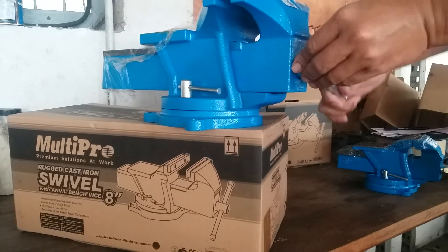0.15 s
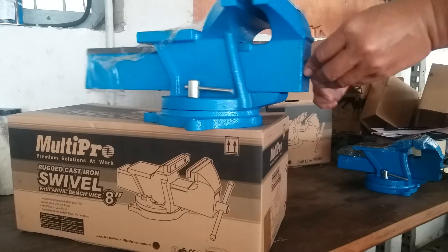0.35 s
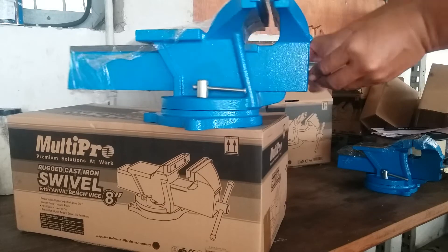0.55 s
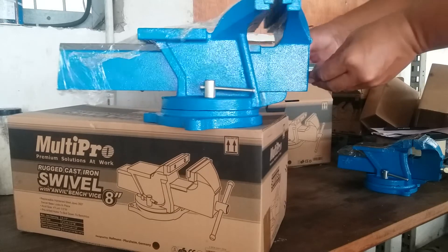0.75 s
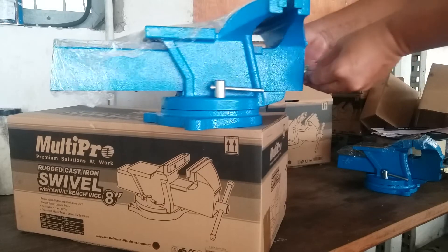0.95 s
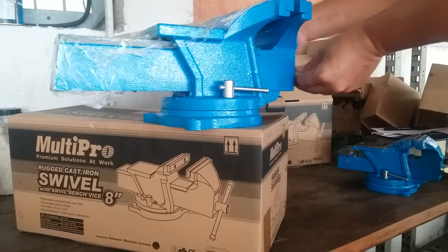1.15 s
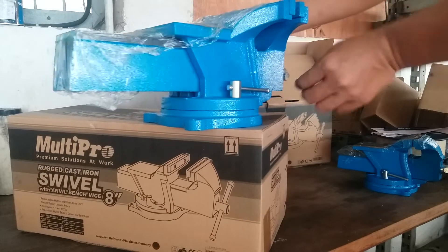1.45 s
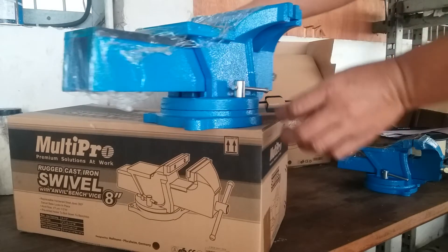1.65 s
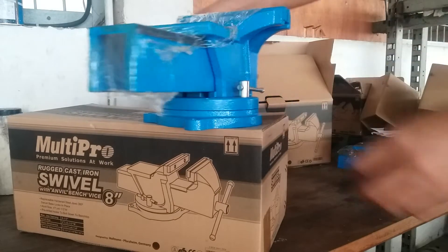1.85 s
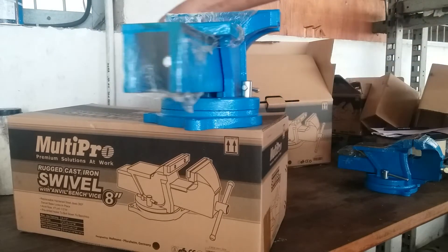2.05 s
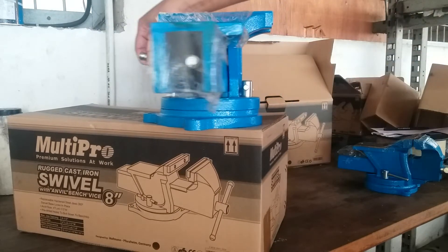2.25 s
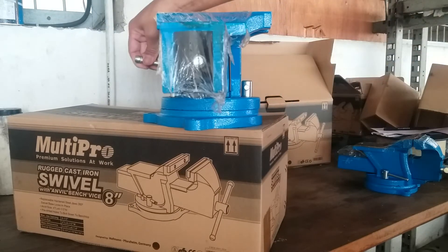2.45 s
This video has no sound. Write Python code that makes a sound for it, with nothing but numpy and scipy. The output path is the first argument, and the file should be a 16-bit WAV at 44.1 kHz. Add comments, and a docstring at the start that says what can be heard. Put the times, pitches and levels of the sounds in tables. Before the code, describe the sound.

Rough iron-on-iron scraping of a turning bench vise, with knocks, hollow box rumble and a final clunk

```python
"""Iron vise turning on a carton

A heavy cast-iron vise, standing on a cardboard carton, is pushed round on its swivel base in a workshop.
Noise grains and sudden catches ring the iron; a wandering low tone and resonant noise boom in the carton.
The loose steel handle ticks in decaying sines, plastic wrap snaps in noise puffs, a clunk ends the turn.
A low hum and hiss of shaped noise and thin gliding sine whistles stay behind."""
import sys
import numpy as np
from scipy import signal
from scipy.fft import rfft, irfft, next_fast_len
from scipy.io import wavfile
from scipy.ndimage import uniform_filter1d, map_coordinates

SR = 44100
rng = np.random.default_rng(int(sys.argv[2]) if len(sys.argv) > 2 else 0)


def master(y):
    """Save y as 16-bit WAV."""
    cut = np.clip(np.atleast_2d(y).T, -1, 1)
    pcm = np.round(cut * 32767)  # scale
    wavfile.write(sys.argv[1], SR, pcm.astype(np.int16))


N = 114660
T = np.arange(N) / SR
SIDES = np.array([[.5], [-.5]])  # shares a left-minus-right difference between the two ears

# Hum and hiss, spectral shape: f/Hz, level/dB
FLOOR_SHAPE = [(18, -28), (30, 4.5), (105, -1.5), (193, -2.5), (257, -17.5), (391, -14.5), (952, -26),
               (1980, -26.5), (2200, -27), (4020, -36), (7950, -48), (12400, -38.5), (15700, -39)]
# Hum and hiss, left-right likeness: f/Hz, correlation (-1 to 1)
FLOOR_LIKENESS = [(60, 1), (240, 0.89), (950, -0.038), (3770, -0.25), (15000, -0.13)]
FLOOR_DB = -47
HISS_TOP_HZ, TOP_HZ = 15800, 16600  # upper edge of hiss and sizzle; of the whole mix

# Faces catching: t/s, level/dB, brightness level/dB against the dull part, scrape decay/s
CATCHES = [(0.029, -45.5, 2, 0.0042), (0.185, -51, -6, 0.0044), (0.21, -41, -16, 0.01),
           (0.2493, -36, -14, 0.0063), (0.264, -41, -21.5, 0.0017), (0.275, -24.5, -0.5, 0.0017),
           (0.283, -33, -6, 0.014), (0.322, -29, -7.5, 0.0051), (0.36, -30, -15, 0.0053),
           (0.379, -37, -2, 0.004), (0.398, -30, -19, 0.0034), (0.429, -25.5, -10.5, 0.0026),
           (0.436, -29.5, -25, 0.0042), (0.460, -22.5, -12, 0.0021), (0.508, -28, -9.5, 0.0024),
           (0.667, -32.5, -6.5, 0.0032), (0.708, -35, 1.5, 0.0024), (0.746, -27.5, -7, 0.0025),
           (0.844, -26, -7, 0.0027), (0.859, -22.5, -11, 0.0046), (0.901, -26, -6.5, 0.0027),
           (0.924, -28.5, -7, 0.0048), (0.993, -24, -8.5, 0.0045), (1.021, -36, -15, 0.0067),
           (1.058, -23.5, -18, 0.0027), (1.079, -29.5, -8, 0.0034), (1.119, -26.5, -10, 0.0038),
           (1.165, -28, -6.5, 0.0037), (1.211, -38, -14.5, 0.0017), (1.243, -34.5, -9, 0.0076),
           (1.403, -37.5, -13, 0.0041), (1.427, -38.5, -28, 0.015), (1.477, -41, -22, 0.0048),
           (1.523, -20.5, -11, 0.0018), (1.532, -23.5, -9.5, 0.0075), (1.593, -19, -13, 0.0029),
           (1.632, -23.5, -13.5, 0.0037), (1.688, -33.5, -21.5, 0.003), (1.716, -34, -13.5, 0.0046),
           (1.731, -22.5, -18, 0.0014), (1.745, -25, -14.5, 0.0072), (1.781, -18, -16.5, 0.0034),
           (1.795, -34, -24, 0.0043), (1.856, -39.5, -23, 0.0043), (1.876, -25.5, -12, 0.0023),
           (1.921, -30, -14, 0.0034), (1.976, -39.5, -5, 0.0036), (2.036, -35, -14, 0.0045),
           (2.092, -35.5, -14, 0.0025), (2.120, -33, -25, 0.0044), (2.166, -26, -20, 0.0039),
           (2.249, -33, -18.5, 0.0023), (2.271, -31, -8, 0.0052)]
CATCH_RISE_S, CATCH_MIN_DECAY_S = .0008, .002
BLOW_DB = -1  # the sharp blow that opens a catch, against its scrape
# Grinding faces: t/s, body level/dB, bright rasp level/dB
GRIND_LEVELS = [(.17, -77, -74), (.24, -62.5, -56), (.26, -38.5, -46.5), (.33, -41, -44.5), (.41, -48, -53),
                (.5, -40.5, -47), (.6, -40.5, -48), (.7, -46.5, -51), (.82, -42, -48), (.99, -39.5, -45.5),
                (1.12, -48, -47.5), (1.25, -42, -53), (1.31, -45.5, -50), (1.37, -78, -64.5),
                (1.45, -50, -55.5), (1.52, -59.5, -53), (1.66, -50, -53), (1.76, -43, -54.5),
                (1.96, -44.5, -52.5), (2.08, -66, -59.5), (2.16, -52.5, -62), (2.25, -42.5, -54),
                (2.3, -42.5, -58), (2.34, -64, -66)]
# Casting's resonances: f/Hz, width/Hz of each of two stacked stages, level/dB
IRON_MODES = [(429.6, 48.6, 5.5), (545, 147, 8), (790, 119, 1), (1034, 206, 5.5), (1359, 170, -9.5),
              (1594, 205, -14), (1766, 200, -14.5), (2055, 168, -24), (2486, 136, -21.5),
              (2610, 190, -22.5), (3368, 250, -27.5), (4040, 79, -28), (4393, 320, -30.5), (5400, 350, -40)]
# Broad response under those modes: f/Hz, level/dB
IRON_BROAD = [(300, -22), (450, -9.5), (1100, -12.5), (1700, -19), (3000, -31.5), (5000, -42.5),
              (7000, -63.5)]
BRIGHT_HZ, IRON_TOP_HZ = 1285, 6200  # dull/bright crossover; the casting passes little above the top
CATCH_BROAD_DB, GRIND_BROAD_DB = 12, 5  # lift of the broad part over the modes
MODE_FLUTTER_PER_S, MODE_FLUTTER_DB, CATCH_FLUTTER_DB = 49, 3.5, 1.5  # uneven feed to each mode
MODES_FADE_DB_PER_S = 3  # the modes sink into the broad part as the body turns away
GRAINS_PER_S, GRAIN_SPREAD_DB, GRAIN_CAP_DB = 700, 3, 13
SMOOTH_DB, FLUTTER_DB = -7, -0.14  # steady noise among the grains; slow level flutter
JUDDER = 0.16  # how deeply the shudder sways the grit (0-1)

# Carton boom: t/s, level/dB
BOOM_LEVELS = [(0.17, -73.5), (0.21, -43.5), (0.29, -26.5), (0.31, -37.5), (0.36, -25.5), (0.39, -38),
               (0.43, -28.5), (0.45, -31.5), (0.64, -30), (0.69, -36), (0.72, -26.5), (0.75, -36.5),
               (0.77, -24.5), (0.8, -24.5), (0.82, -27), (0.88, -25), (0.93, -36), (1.03, -24.5),
               (1.11, -38.5), (1.13, -26.5), (1.18, -25), (1.21, -55), (1.24, -30), (1.3, -42.5),
               (1.46, -36.5), (1.49, -36.5), (1.53, -53), (1.58, -65.5), (1.6, -37.5), (1.67, -26),
               (1.7, -49), (1.74, -29.5), (1.82, -26), (1.86, -41.5), (1.9, -28), (1.94, -38.5),
               (1.96, -37.5), (2.05, -25.5), (2.07, -71.5), (2.09, -28.5), (2.15, -75), (2.18, -31),
               (2.22, -62.5), (2.27, -26.5), (2.29, -34.5), (2.36, -66)]
# Carton wall thuds: t/s, level/dB
WALL_LEVELS = [(0.17, -68), (0.21, -48), (0.28, -31.5), (0.32, -35.5), (0.35, -25), (0.41, -37),
               (0.76, -36), (0.82, -49.5), (0.95, -31), (1.04, -43), (1.06, -32), (1.21, -46), (1.24, -29),
               (1.36, -46.5), (1.41, -56), (1.45, -41), (1.48, -51), (1.55, -30.5), (1.58, -38.5),
               (1.61, -28.5), (1.69, -38.5), (1.86, -34), (1.91, -44.5), (2.22, -43), (2.28, -30.5),
               (2.36, -56)]
# Carton wall resonances: f/Hz, width/Hz, level/dB
WALL_MODES = [(220, 167, -4), (289, 46.4, 4.5), (355.6, 42, -7.5)]
BOOM_HZ, BOOM_WANDER_HZ, BOOM_WIDTH_HZ = 130, 8, 34
BOOM_NOISE_DB, OVERTONE_DB = -2.5, -16  # against the pure shudder tone
RUMBLE_DB, RUMBLE_HZ, RUMBLE_WIDTH_HZ = -10, 82, 36  # the bench under the carton, below the boom
SIZZLE_DB, SIZZLE_HZ, SIZZLE_OCTAVES = -26, 11300, 0.93  # faint treble sizzle that follows the rasp

# Thin whistles: start t/s, length/s, start f/Hz, end f/Hz, level/dB
WHISTLES = [(0.175, .06, 12300, 12700, -83), (0.387, 0.038, 13400, 12900, -68),
            (2.35, 0.045, 12400, 12800, -71), (2.41, 0.033, 12000, 12500, -75),
            (2.495, 0.048, 12600, 11800, -71), (2.542, .04, 11900, 12600, -73)]
WHISTLE_FLUTTER_DB = 5

# Wrap snaps: t/s, level/dB, left-right level/dB, t60/s, rustle level/dB against the snap, centre f/Hz
SNAPS = [(0.2291, -51.5, 6, 0.003, -40, 3520), (0.505, -57.5, 3, 0.0033, -40, 12000),
         (0.528, -38, -3, 0.0027, -42, 5440), (0.714, -44.5, 5, 0.029, -36, 13170),
         (1.267, -52, 10, 0.011, -23.5, 5040), (1.309, -39.5, 5, 0.011, -20.5, 5550),
         (1.314, -51.5, -3, 0.0025, -39, 12700), (1.4445, -40, -4.5, 0.006, -56, 7050),
         (1.558, -48.5, 8.5, 0.008, -35, 7900), (2.268, -51, 8, 0.0064, -16, 5000)]
# Colour of wrap snaps and handle cracks: f/Hz, level/dB
WRAP_COLOUR = [(2000, -0.5), (4000, 10), (7800, -4.5), (12500, 6.5), (16000, 0)]
PUFF_OCTAVES, RUSTLE_T60_S, RUSTLE_HZ = 1.2, 0.53, 4440

# Handle ticks: t/s, level/dB, left-right level/dB, centre f/Hz of the top mode cluster
TICKS = [(0.268, -54, 15, 12100), (0.288, -45, 14.5, 12500), (0.669, -49, -5, 12200),
         (0.71, -58.5, -0.5, 13900), (0.848, -54, 3, 11800), (0.922, -51, 9, 12200),
         (1.124, -55, -4, 12100), (1.5294, -49.5, 2, 12300), (1.5987, -40.5, -1, 12500),
         (1.7856, -56, -4.5, 12300), (2.283, -57, 7, 12100)]
# Handle's other modes: f/Hz, level/dB, t60/s
STEEL_MODES = [(4450, -1.5, 0.04), (4900, -1.5, 0.02), (6570, -13, 0.01), (9100, -27, 0.018),
               (10730, -10, .02), (14700, -24.5, 0.045)]
TICK_T60_S, TICK_SPLIT_HZ = .04, 350  # decay and random spread of the top mode cluster
TICK_RING_DB, CRACK_DB, CRACK_T60_S = -8.5, -17.5, .01

# Clunk as the body comes to rest: f/Hz, level/dB, t60/s
CLUNK_MODES = [(1140, -2, 0.083), (1360, -3, 0.041), (1496, 2, 0.021), (1640, -5.5, 0.03),
               (3430, -27, 0.12)]
STOP_S, STOP_DB = 2.270, -32.5

# Room decay: f/Hz, t60/s
ROOM_T60 = [(200, 0.39), (2000, 0.14), (10000, 0.12)]
# Room against direct sound: f/Hz, level/dB
ROOM_COLOUR = [(150, -18.5), (600, -9), (1200, -2), (2500, 0.5), (8000, 3.5)]
ECHO_BLOCK_S, ECHO_DELAY_S = .2, .003
SNAP_ROOM_DB = -8  # the small near clicks stir the room less than the vise

# Vise's stereo lean: f/Hz, left-right level/dB
STEREO_LEAN = [(130, -0.55), (1000, 0), (4000, -0.5), (10000, 7.5)]
LAG_S = 5e-5  # lead of the left ear over the right
SHELF, BASS_HZ = .07, 62  # linear gain left in the deep bass; corner of the bass drop


def amp(db):
    """Decibels to linear gain."""
    return 10 ** (np.asarray(db) / 20)


def unit(x):
    """Scale to an RMS of one."""
    return x / np.sqrt(np.mean(x ** 2) + 1e-20)


def along(points, hz):
    """Read (Hz, value) points on a log-frequency axis."""
    f, v = np.transpose(points)
    return np.interp(np.log(hz + 1), np.log(f + 1), v)


def curves(rows):
    """Gain per sample for each dB column, at -120 dB outside the table."""
    s, *columns = np.transpose(rows)
    return [amp(np.interp(T, s, column, -120, -120)) for column in columns]


def wobble(rate):
    """A smooth random curve, rate knots a second."""
    knots = rng.standard_normal(int(N * rate / SR) + 4)
    return map_coordinates(knots, [T * rate])


def filtered(x, response):
    """Shape x by a complex response of frequency, padded so that tails do not wrap round."""
    m = 2 * next_fast_len(N // 2 + SR // 4)
    f = np.fft.rfftfreq(m, 1 / SR)
    return irfft(rfft(x, m) * response(f), m)[..., :N]


def bell(f, hz, octaves):
    """Gain of a log-frequency bell, 6 dB down at the given octaves either side."""
    return amp(-6 * (np.log2((f + 1) / hz) / octaves) ** 2)


def modes(table):
    """Causal response of a set of resonances, alternating in sign."""
    def response(f):
        return sum((-1) ** k * amp(db) * 1j * f * width / (hz * hz - f * f + 1j * f * width)
                   for k, (hz, width, db) in enumerate(table))
    return response


def causal(gain):
    """Minimum-phase response with this gain, by folding its cepstrum."""
    c = irfft(np.log(gain + 1e-6))
    c[1:len(c) // 2] *= 2
    c[len(c) // 2 + 1:] = 0
    return np.exp(rfft(c))


def add(track, s, sound):
    """Mix a sound in at time s."""
    part = track[..., round(s * SR):][..., :sound.shape[-1]]
    part += sound[..., :part.shape[-1]]


def ring(table):
    """One blow on a set of modes: decaying sines, each at a new level and phase."""
    t = T[:SR // 4]
    out = np.zeros(len(t))
    for hz, db, t60 in table:
        envelope = amp(db + rng.normal(0, 0.69) - 60 * t / t60)
        out += envelope * np.sin(2 * np.pi * hz * t + rng.uniform(0, 2 * np.pi))
    return out


def puff(t60, hz):
    """A short decaying noise burst, centred on one frequency."""
    t = T[:4096]
    burst = amp(-60 * t / t60) * rng.standard_normal(len(t))
    f = np.fft.rfftfreq(len(t), 1 / SR)
    return irfft(rfft(burst) * causal(bell(f, hz, PUFF_OCTAVES)))


def background():
    """Hum and hiss: shaped noise whose mid and side shares set how alike the ears are."""
    def shares(f):
        turn = np.arccos(np.clip(along(FLOOR_LIKENESS, f), -1, 1)) / 2
        return amp(along(FLOOR_SHAPE, f)) * (f < HISS_TOP_HZ) * [np.cos(turn), np.sin(turn)]

    mid, side = filtered(rng.standard_normal((2, N)), shares)
    return amp(FLOOR_DB) * unit(np.array([mid + side, mid - side]))


def grit(phase):
    """Random grains on steady noise, louder at each crest of the shudder."""
    size_db = np.minimum(GRAIN_SPREAD_DB * rng.exponential(size=N), GRAIN_CAP_DB)
    hits = rng.random(N) < GRAINS_PER_S / SR
    grains = hits * rng.choice([-1, 1], N) * amp(size_db)
    mix = unit(grains) + amp(SMOOTH_DB) * rng.standard_normal(N)
    return unit(mix * amp(FLUTTER_DB * wobble(29.9)) * (1 + JUDDER * np.cos(phase)))


def casting(force, slope, broad_db, flutter_db):
    """The iron's dull (slope > 0) or bright answer; the moving contact feeds each steep mode unevenly."""
    def parts(f):
        rings = [amp(db) * modes([(hz, width, 0)])(f) ** 2 for hz, width, db in IRON_MODES]
        return np.array(rings + [-causal(amp(broad_db + along(IRON_BROAD, f)))])

    def response(f):
        split = 1 / (1 + ((f + 1) / BRIGHT_HZ) ** slope) / np.sqrt(1 + (f / IRON_TOP_HZ) ** 8)
        bank = parts(f)
        power = np.mean(np.sum(np.abs(bank * split) ** 2, axis=0))
        return bank * causal(split) / np.sqrt(power)

    fed = [amp(flutter_db * wobble(MODE_FLUTTER_PER_S)) * part for part in filtered(force, response)]
    *rings, broad = fed
    fade = amp(MODES_FADE_DB_PER_S * (T.mean() - T))
    return fade * sum(rings) + broad


def swivel(phase):
    """Grit rings the casting's modes; catches knock it more broadly, each with its own brightness."""
    dull, bright, t = np.zeros(N), np.zeros(N), T[:SR // 8]
    for s, db, bright_db, decay in CATCHES:
        shape = (1 - np.exp(-t / CATCH_RISE_S)) * np.exp(-t / max(decay, CATCH_MIN_DECAY_S))
        impulse = np.arange(len(t)) == round(CATCH_RISE_S * SR)
        blow = amp(BLOW_DB) * np.linalg.norm(shape) * impulse
        scrape = shape * rng.standard_normal(len(t))
        force = amp(db) * (blow + scrape)
        add(dull, s, force)
        add(bright, s, amp(bright_db) * force)

    level, rasp = curves(GRIND_LEVELS)
    grind = casting(level * grit(phase), 3.4, GRIND_BROAD_DB, MODE_FLUTTER_DB)
    grind += casting(rasp * grit(phase), -5, GRIND_BROAD_DB, MODE_FLUTTER_DB)
    catches = casting(dull, 2.95, CATCH_BROAD_DB, CATCH_FLUTTER_DB)
    catches += casting(bright, -3, CATCH_BROAD_DB, CATCH_FLUTTER_DB)
    return grind + catches


def carton(phase):
    """The box shudders at its air resonance; bench and walls rumble along as resonant noise."""
    def noise(table):
        lowpassed = lambda f: modes(table)(f) / (1 + (f / 450) ** 4)
        return unit(filtered(rng.standard_normal(N), lowpassed))

    (boom,), (thud,) = curves(BOOM_LEVELS), curves(WALL_LEVELS)
    # the overtone sharpens the shudder's crests
    tone = unit(np.cos(phase) + amp(OVERTONE_DB) * np.cos(2 * phase))
    air = unit(tone + amp(BOOM_NOISE_DB) * noise([(BOOM_HZ, BOOM_WIDTH_HZ, 0)]))
    bench_level = amp(RUMBLE_DB) * uniform_filter1d(boom, size=4000)
    bench = bench_level * noise([(RUMBLE_HZ, RUMBLE_WIDTH_HZ, 0)])
    return boom * air + bench + thud * noise(WALL_MODES)


def sizzle(phase):
    """Fine treble grit under the rasp's level, made separately for each ear."""
    _, rasp = curves(GRIND_LEVELS)
    band = lambda f: bell(f, SIZZLE_HZ, SIZZLE_OCTAVES) * (f < HISS_TOP_HZ)
    grains = np.array([grit(phase), grit(phase)])
    return amp(SIZZLE_DB) * rasp * unit(filtered(grains, band))


def whistles():
    """Thin gliding sines with a fluttering level, the same in both ears."""
    out = np.zeros((2, N))
    for s, length, from_hz, to_hz, db in WHISTLES:
        u = T[:int(length * SR)] / length
        level = amp(db + WHISTLE_FLUTTER_DB * wobble(200)[:len(u)]) * np.sin(np.pi * u) ** .5
        glide_hz = from_hz + (to_hz - from_hz) * u
        add(out, s, level * np.sin(2 * np.pi * np.cumsum(glide_hz) / SR))
    return out


def wrap_snaps():
    """The plastic wrap clicks in a noise puff, then rustles out in a longer, fainter one."""
    out = np.zeros((2, N))
    for s, db, pan_db, t60, rustle_db, hz in SNAPS:
        snap = puff(max(t60, .002), hz)
        rustle = amp(rustle_db) * puff(RUSTLE_T60_S, RUSTLE_HZ)
        add(out, s, amp(db + SIDES * pan_db) * (snap + rustle))
    return filtered(out, lambda f: amp(along(WRAP_COLOUR, f)))


def handle_ticks():
    """The loose steel bar cracks in a noise puff and rings briefly on its modes at each tick."""
    rings, cracks = np.zeros((2, N)), np.zeros((2, N))
    for s, db, pan_db, hz in TICKS:
        cluster = [(hz + TICK_SPLIT_HZ * d, -4 * abs(d), TICK_T60_S) for d in rng.normal(size=4)]
        level = amp(db + SIDES * pan_db)
        add(rings, s, level * amp(TICK_RING_DB) * ring(STEEL_MODES + cluster))
        add(cracks, s, level * amp(CRACK_DB) * puff(CRACK_T60_S, hz))
    return rings + filtered(cracks, lambda f: amp(along(WRAP_COLOUR, f)))


def stop_clunk():
    """The body comes to rest: one blow on a few decaying modes."""
    out = np.zeros(N)
    add(out, STOP_S, amp(STOP_DB) * ring(CLUNK_MODES))
    return out


def room(x):
    """Separate noise tails for each ear, dying by frequency; a fresh pair crossfades in every 0.2 s."""
    wet = np.zeros((2, N))
    for s in np.arange(0, N / SR + ECHO_BLOCK_S, ECHO_BLOCK_S):
        hz, t, z = signal.stft(rng.standard_normal((2, SR // 3)), SR, nperseg=256)
        decay = amp(-60 * t / along(ROOM_T60, hz)[:, None])
        tail = signal.istft(z * decay, SR, nperseg=256)[1]
        start = max(s - ECHO_BLOCK_S, 0)
        fade = np.clip(1 - np.abs(T - s) / ECHO_BLOCK_S, 0, 1)
        piece = (x * fade)[:, round(start * SR):round((s + ECHO_BLOCK_S) * SR)]
        echo = signal.fftconvolve(piece, tail / np.linalg.norm(tail[0]), axes=1)
        add(wet, start + ECHO_DELAY_S, echo)
    return filtered(wet, lambda f: amp(along(ROOM_COLOUR, f)))


def scene():
    """One wandering shudder drives box and grit; the vise reaches the left ear first, with more top treble."""
    def place(f):
        return amp(SIDES * along(STEREO_LEAN, f)) * np.exp(2j * np.pi * f * SIDES * LAG_S)

    phase = 2 * np.pi * np.cumsum(BOOM_HZ + BOOM_WANDER_HZ * wobble(25.06)) / SR
    vise = filtered(carton(phase) + swivel(phase) + stop_clunk(), place)
    clicks = handle_ticks() + wrap_snaps()
    echoes = room(vise + amp(SNAP_ROOM_DB) * clicks)
    return vise + clicks + echoes + sizzle(phase) + background() + whistles()


def record(dry):
    """The microphone drops the deep bass to a shelf; nothing passes above the band limit."""
    def response(f):
        bass_drop = 1 / (1 + (BASS_HZ / (f + 1)) ** 8)
        return (f < TOP_HZ) * (SHELF + bass_drop)

    return filtered(dry, response)


dry = scene()
out = record(dry)
master(out)
```